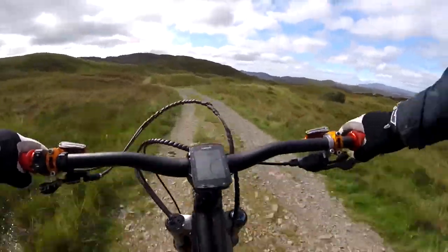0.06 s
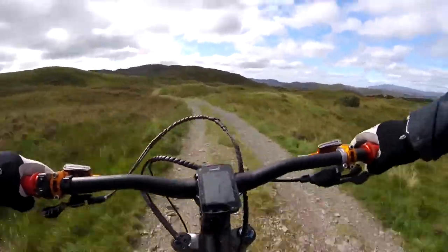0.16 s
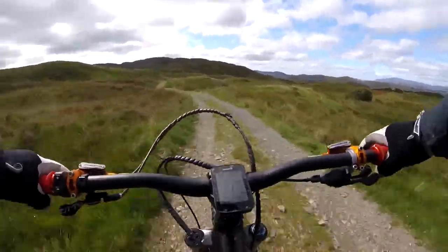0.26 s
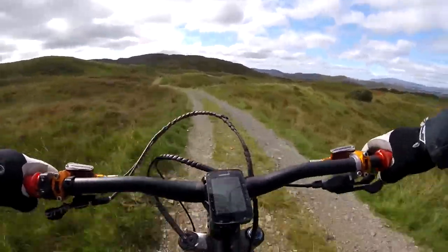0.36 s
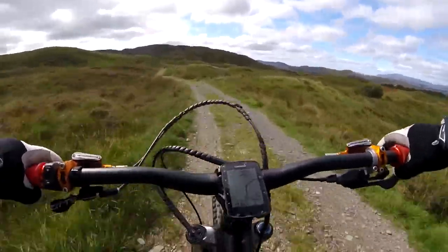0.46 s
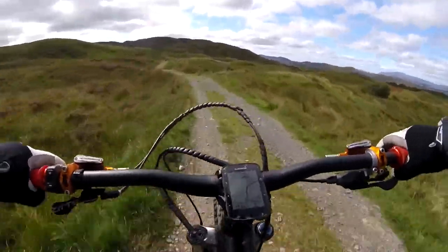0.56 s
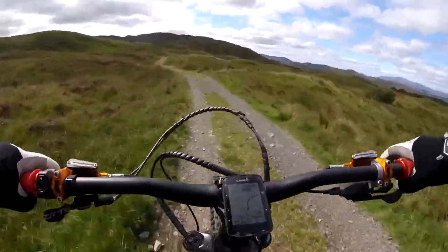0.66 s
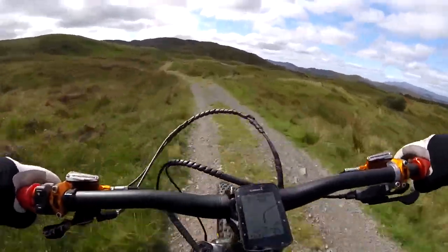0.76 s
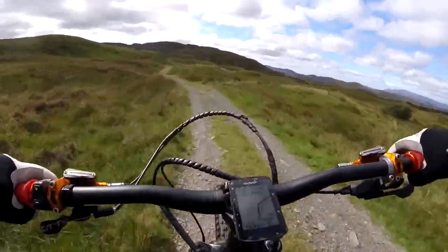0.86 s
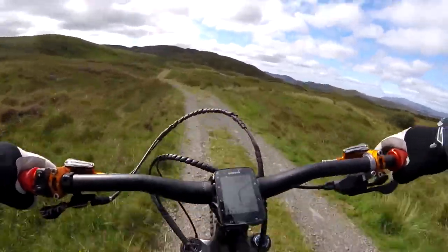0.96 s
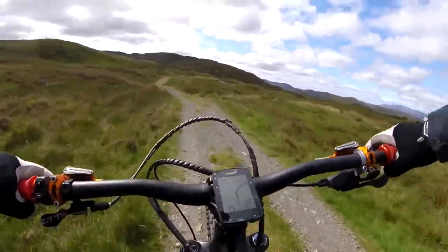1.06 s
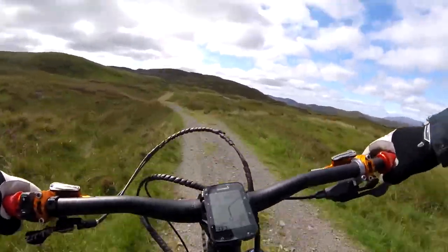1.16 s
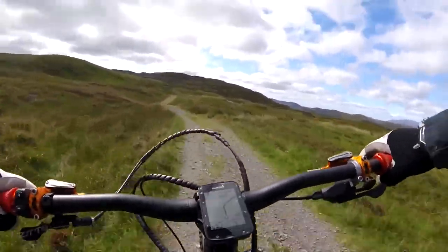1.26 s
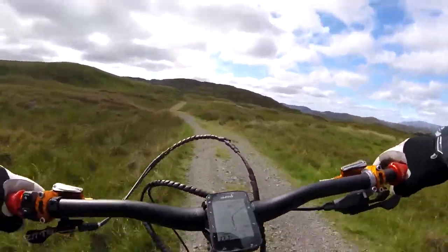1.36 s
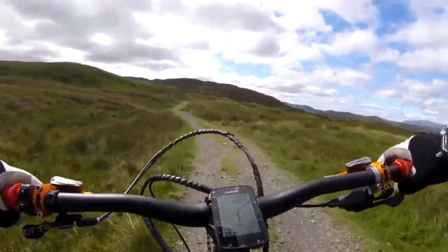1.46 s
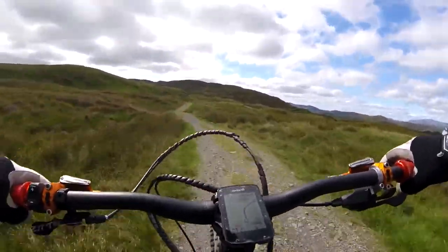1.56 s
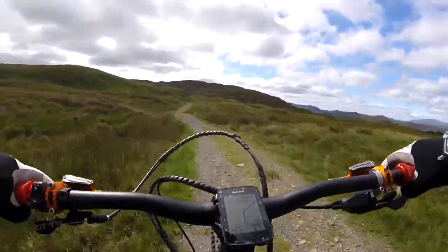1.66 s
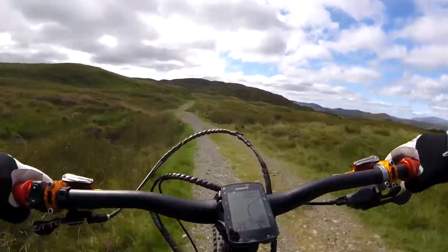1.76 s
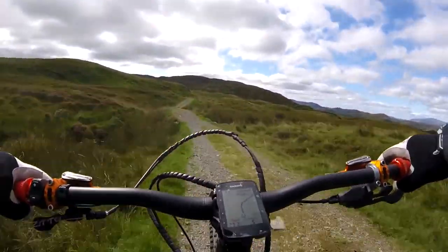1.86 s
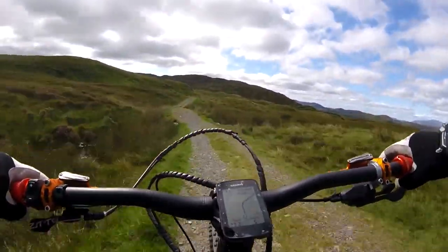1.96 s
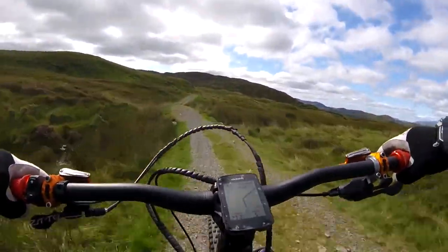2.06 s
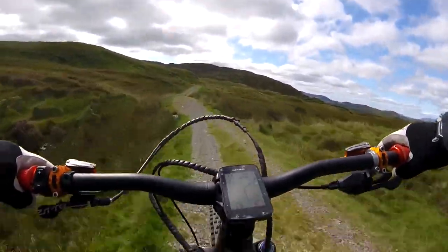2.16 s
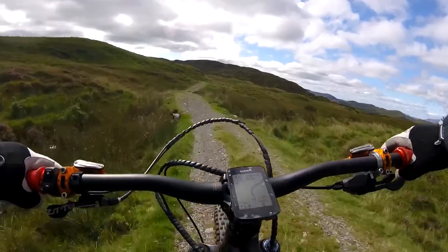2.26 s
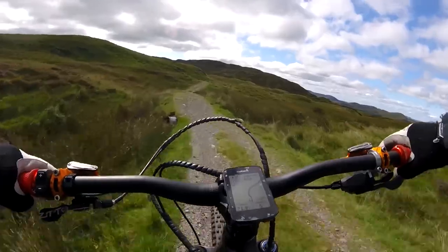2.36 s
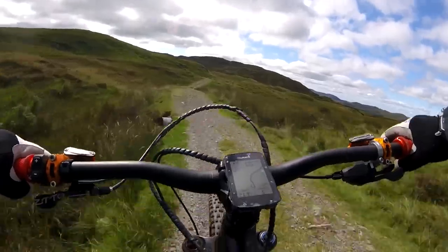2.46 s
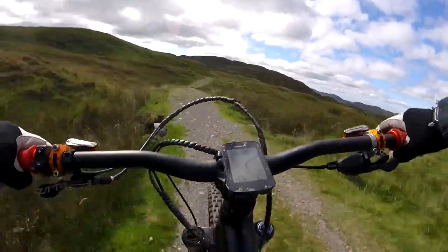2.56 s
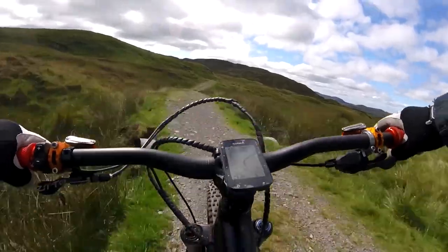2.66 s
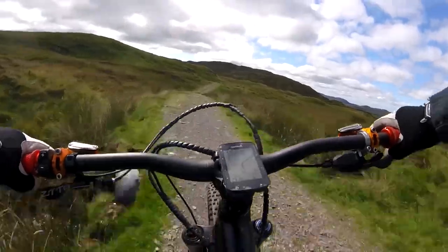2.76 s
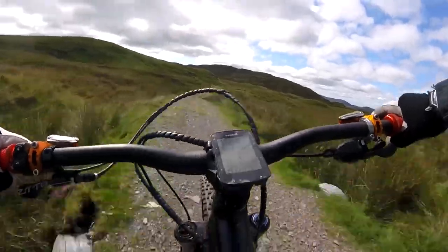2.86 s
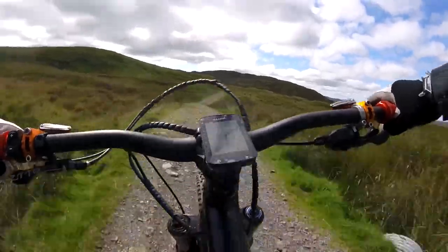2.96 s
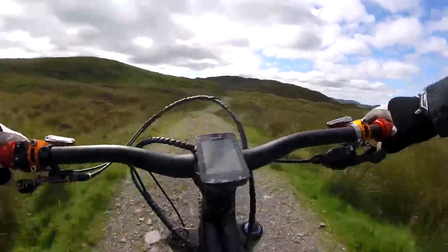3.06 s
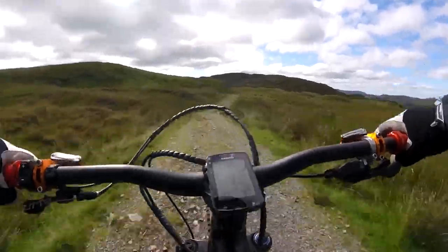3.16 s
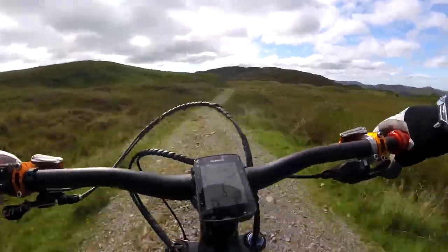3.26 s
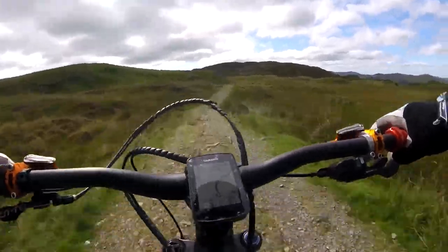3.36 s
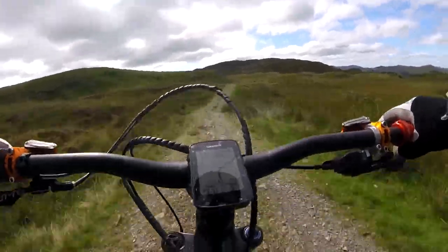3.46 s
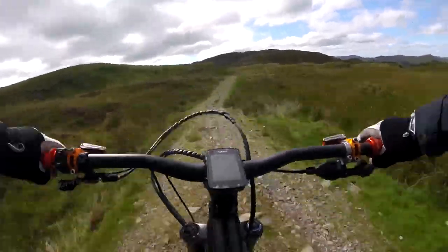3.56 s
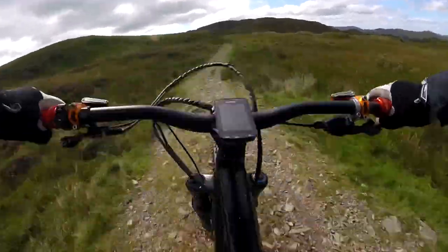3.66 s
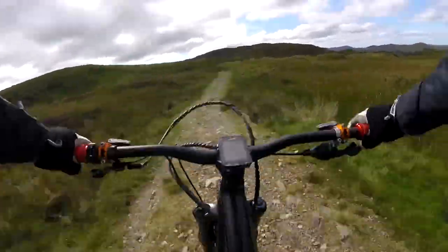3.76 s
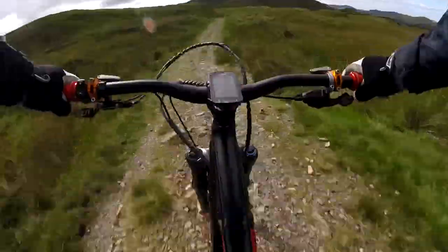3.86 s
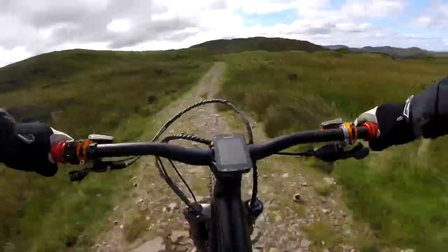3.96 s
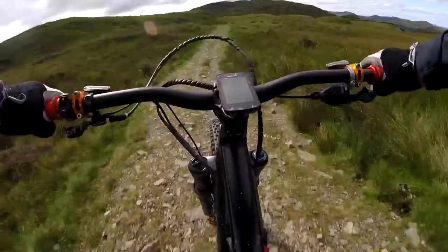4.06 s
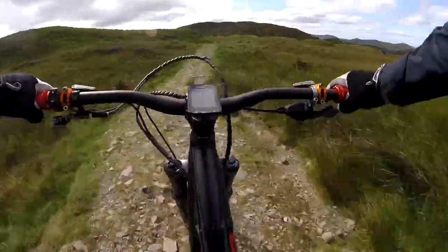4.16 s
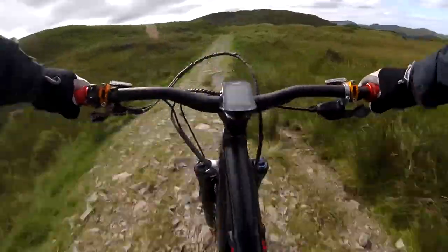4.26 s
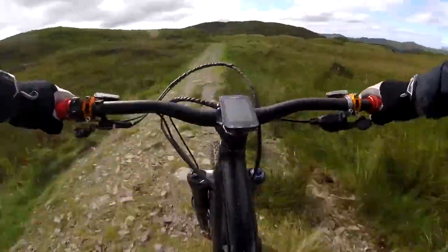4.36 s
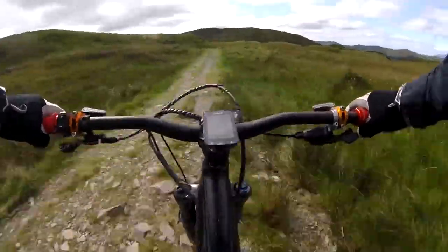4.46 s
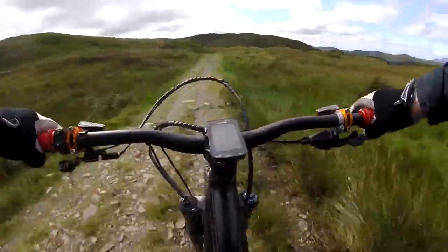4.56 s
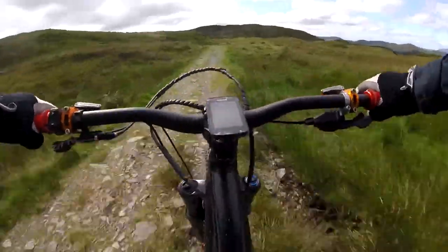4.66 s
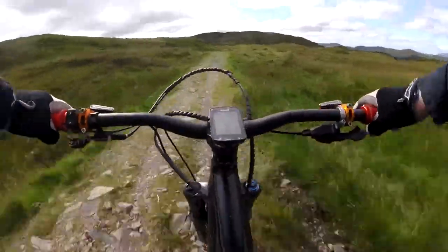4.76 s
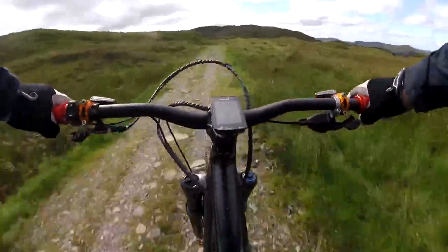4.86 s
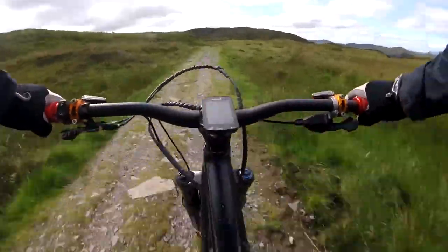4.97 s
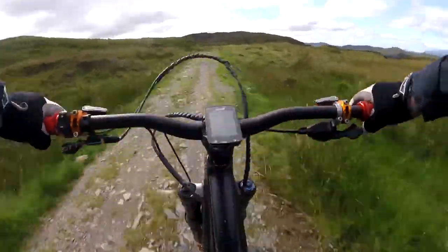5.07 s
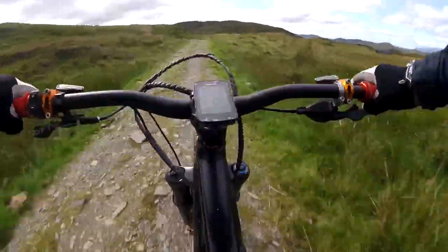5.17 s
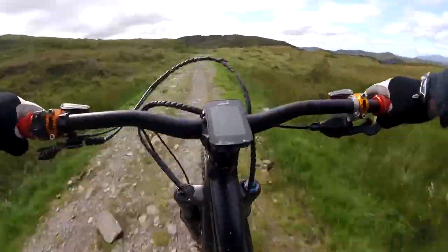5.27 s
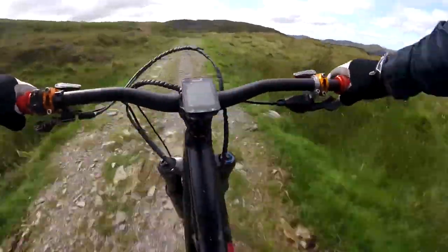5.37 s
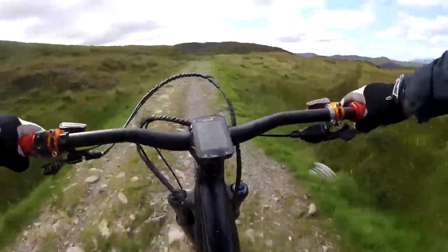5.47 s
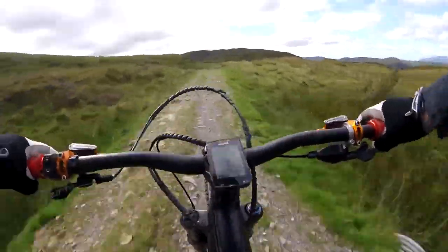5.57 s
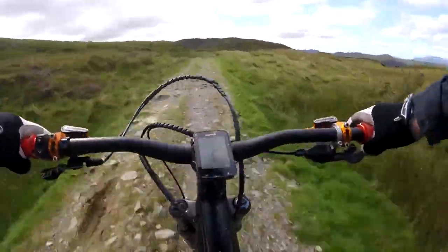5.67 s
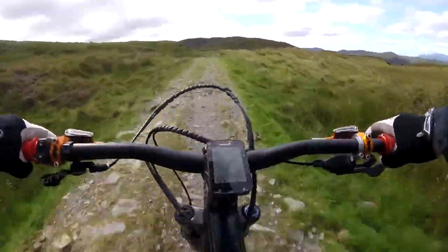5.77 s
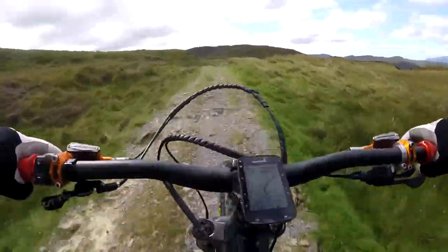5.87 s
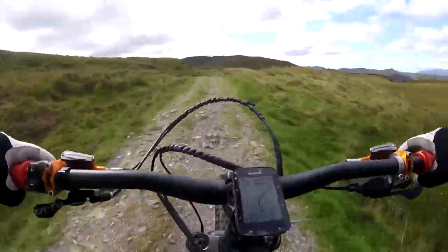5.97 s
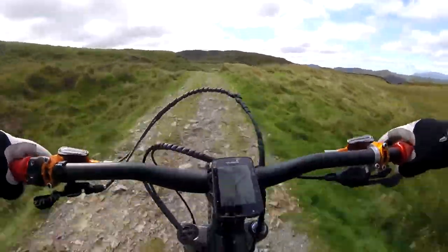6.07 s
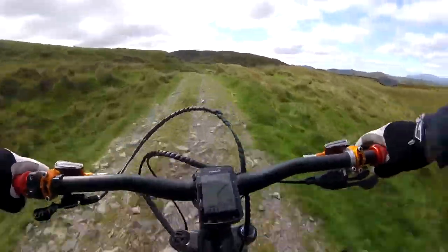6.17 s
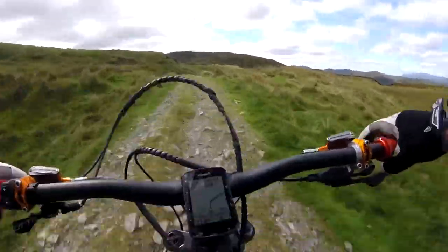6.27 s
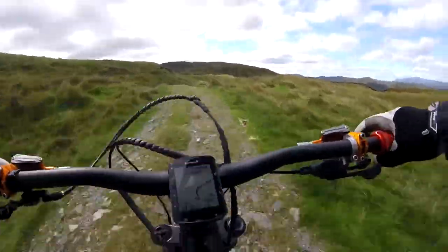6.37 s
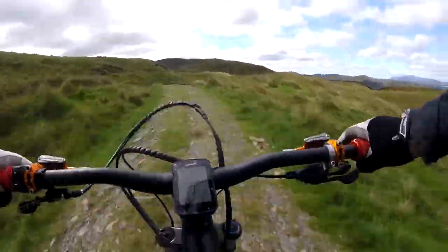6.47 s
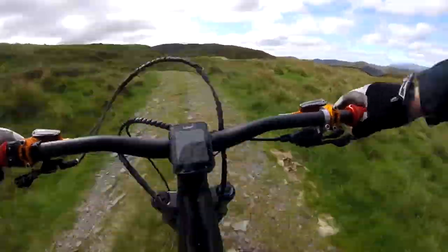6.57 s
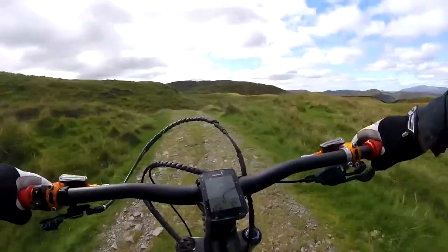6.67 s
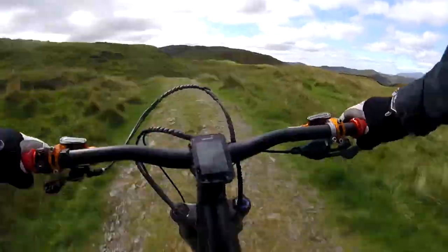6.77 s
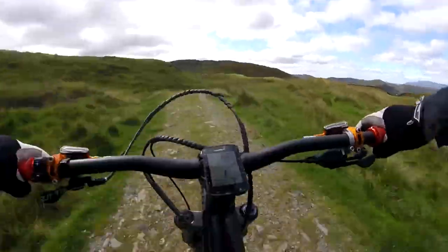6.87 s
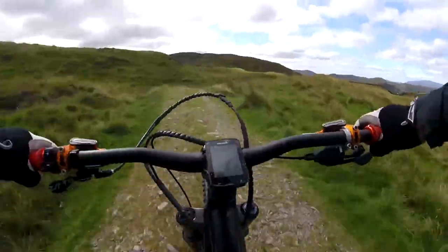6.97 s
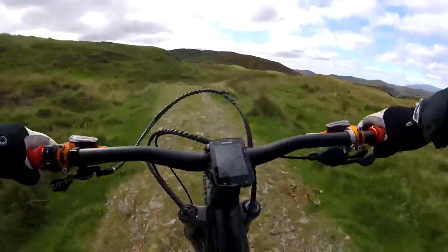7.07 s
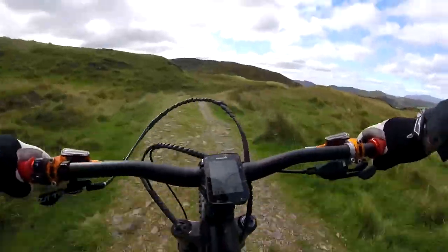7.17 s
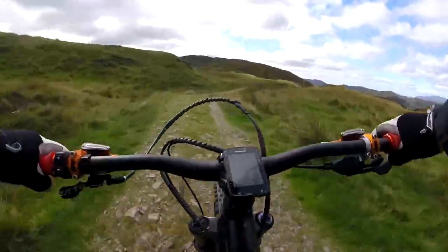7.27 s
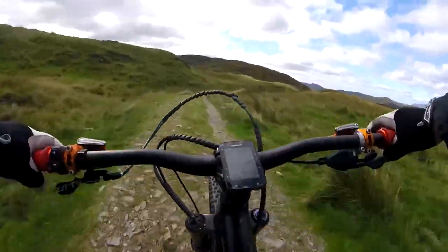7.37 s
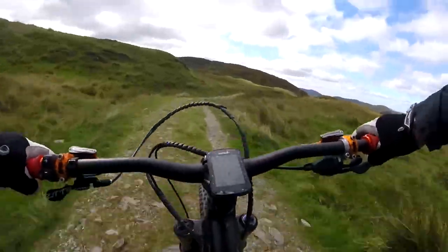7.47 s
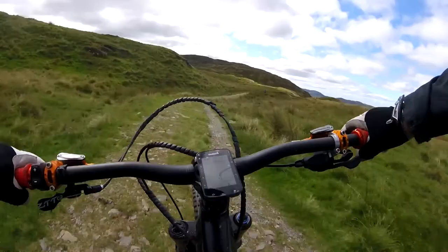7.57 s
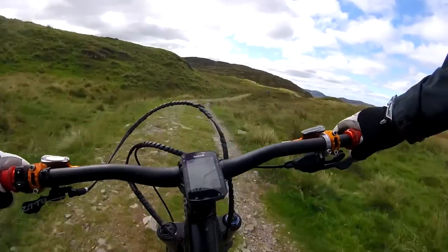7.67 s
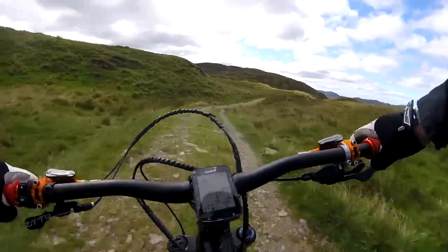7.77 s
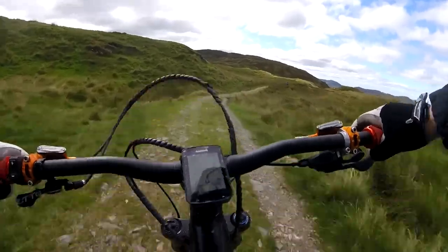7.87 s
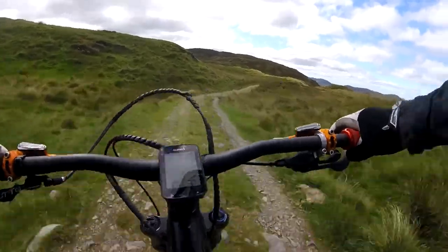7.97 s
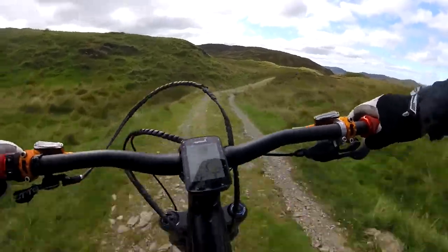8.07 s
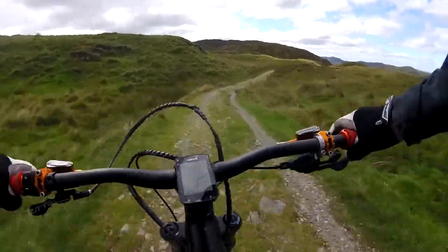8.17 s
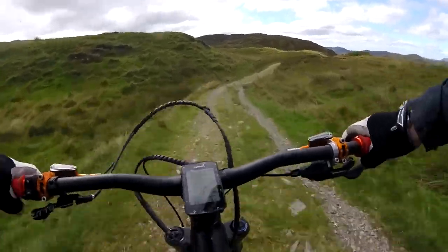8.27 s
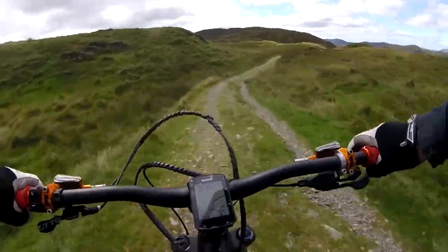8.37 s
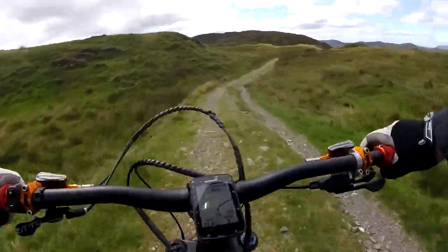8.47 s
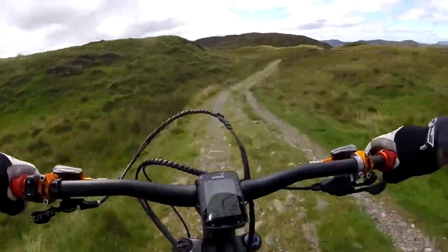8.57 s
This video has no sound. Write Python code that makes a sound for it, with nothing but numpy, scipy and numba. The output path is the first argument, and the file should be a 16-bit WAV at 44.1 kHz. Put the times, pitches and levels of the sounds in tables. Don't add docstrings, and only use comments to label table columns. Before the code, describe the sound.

Close on a rider's chest outdoors, bike tyres grind steadily over gravel with gritty hiss, ticks and dull woody stone knocks. Light wind rumble at first, then violent buffeting and slapping bursts around two and a half seconds and again from four to five and a half, with the hardest thuds. Afterwards the wind drops and quieter crunching, rattles and small pings continue to the end.

```python
import sys
import numpy as np
from scipy import signal
from scipy.fft import rfft, irfft
from scipy.io import wavfile
from scipy.ndimage import uniform_filter1d
from numba import njit

SR = 44100
rng = np.random.default_rng(int(sys.argv[2]) if len(sys.argv) > 2 else 0)


def level_to_linear(level):
    exponent = np.asarray(level, float) / 20
    return 10 ** exponent


def bounce(signal):
    frames = np.transpose(np.atleast_2d(signal))
    limited = np.clip(frames, -1, 1)
    pcm = np.round(limited * 32767).astype(np.int16)
    wavfile.write(sys.argv[1], SR, pcm)


N = 380136


def level(x):
    return x / np.sqrt(np.mean(x ** 2))


def curves(table):
    s, *columns = np.transpose(table)
    return [np.interp(np.arange(N) / SR, s, c) for c in columns]


def colour(x, points, size=8192):
    hz, db = np.transpose(points)
    log_hz = np.log(np.arange(size // 2 + 1) * SR / size + 1)
    log_gain = np.interp(log_hz, np.log(hz), db) * np.log(10) / 20
    cepstrum = irfft(log_gain)
    cepstrum[1:size // 2] *= 2
    cepstrum[size // 2 + 1:] = 0
    return signal.fftconvolve(x, irfft(np.exp(rfft(cepstrum))))[:N]


def bursts(per_s, spread_db, tail_s):
    sizes = level_to_linear(2 * spread_db * rng.exponential(size=N).clip(0, 5))
    starts = (rng.random(N) < per_s / SR) * sizes
    decay = np.exp(-1 / (tail_s * SR))
    power = signal.lfilter([1], [1, -decay], uniform_filter1d(starts, size=100))
    return level(np.sqrt(power + 1e-9))


def swells(start, length, db, edge_s):
    t = np.arange(N) / SR
    power = 0
    for s, held, d in zip(start, length, db):
        inside = np.minimum(t - s, s + held - t) / edge_s + .5
        power = power + level_to_linear(2 * d) * np.clip(inside, 0, 1) ** 2
    return power


@njit
def ring(start, hz, t60, rise, size):
    out = np.zeros(N)
    for k in range(len(start)):
        p = np.exp(2j * np.pi * hz[k] / SR - np.log(1000) / (t60[k] * SR))
        z = size[k] + 0j
        first = int(start[k] * SR)
        for i in range(min(int(t60[k] * SR), N - first)):
            out[first + i] += z.imag * min(1., i / (rise * SR))
            z *= p
    return out


def strike(s, hz, t60, db, rise, scatter, count):
    chance = rng.standard_normal((len(s), 3 * count)).reshape(len(s), 3, count)
    fan = np.linspace(-1, 1.2, count)
    when = s[:, None] + .5 * rise * np.abs(chance[:, 0])
    pitch = hz[:, None] * np.exp(scatter * (fan + 0.17 * chance[:, 1]))
    size = level_to_linear(db[:, None] - 8 * np.abs(fan) + 1.5 * chance[:, 2])
    return ring(when.ravel(), pitch.ravel().clip(30, 11000), np.full(when.size, t60), rise, size.ravel())


def snaps(s, db, t60, points):
    push = np.zeros(N)
    for when, size, life in zip(s, level_to_linear(db), np.clip(t60, .003, .06)):
        t = np.arange(int(life * SR)) / SR
        first = int(when * SR)
        click = size * np.minimum(1, t / 0.001) * 1000. ** (-t / life)
        push[first:first + len(t)] += click[:N - first]
    noise = rng.standard_normal(N)
    return colour(push * noise, points) / np.std(colour(noise, points))


def pebbles(per_s, low_hz, octaves, spread_db):
    chance = rng.random((int(per_s * N / SR), 4)).T
    hz = low_hz * 2 ** (octaves * chance[1])
    size = level_to_linear(-spread_db * np.log(chance[2] + 0.11)) * low_hz / hz
    t60 = (6 + 14 * chance[3]) / hz
    return level(ring(chance[0] * (N - 1) / SR, hz, t60, 0.0019, size))


def wind():
    # start_s, strength_db, bite_db (buffet over rumble)
    breeze = [(0, -30.5, -0.5), (0.6, -32, -3.5), (1.2, -33, -3.5), (2.0, -31.5, -1), (2.6, -27, -6),
              (3.2, -34, -4), (3.8, -33.5, -0.5), (4.6, -26.5, -3.5), (5.5, -27.5, -10.5), (6.0, -30, -6),
              (6.7, -33, -3), (7.1, -32.5, -6.5), (7.7, -31.5, -8), (8.62, -32, -8)]
    # start_s, length_s, strength_db, bite_db
    gusts = [(2.178, 0.063, -22, -5.5), (2.254, 0.057, -16, -16), (2.336, 0.095, -13, -14),
             (2.426, 0.12, -29, -14), (2.537, 0.067, -9, -10), (2.604, 0.11, -14.5, -4.5),
             (2.67, 0.077, -9.5, -7), (2.765, 0.082, -10.5, -21), (2.848, 0.11, -20, -13.5),
             (2.987, 0.023, -8, -20), (3.906, 0.058, -14, -13.5), (3.964, 0.083, -23, -6.5),
             (4.057, 0.22, -10.5, -9.5), (4.122, 0.12, -14.5, -11.5), (4.35, 0.1, -13, -10),
             (4.441, 0.077, -2.5, -15), (4.546, 0.067, -6, -17), (4.628, 0.164, -16.5, -9),
             (4.81, 0.052, -29, -6), (4.907, 0.14, -17, -8.5), (5.053, 0.091, -7.5, -12),
             (5.148, 0.078, -8, -8), (5.227, 0.21, -24.5, -5.5), (5.312, 0.085, -13, -10.5),
             (5.396, 0.042, -22, -2), (5.44, 0.071, -11, -8), (6.602, 0.092, -22.5, -8),
             (6.754, 0.09, -28.5, -3), (7.973, 0.1, -22.5, -17), (8.364, 0.089, -24.5, -10.5)]
    # start_s, strength_db
    short_puffs = [(0.0, -18), (0.26, -33), (0.475, -21), (0.84, -22.5), (1.636, -19), (1.949, -34),
                   (2.025, -41), (3.1, -25), (3.59, -35), (3.69, -24.5), (4.28, -28), (5.93, -23),
                   (6.11, -22), (6.18, -27), (6.367, -26.5), (6.67, -30), (6.779, -23), (7.385, -31),
                   (7.455, -33.5), (8.179, -28), (8.529, -26), (8.59, -27)]
    # pitch_hz, level_db (per Hz)
    rumble_shape = [(12, -27), (20, 0), (53, 2), (123, -4.5), (168, -11), (220, -10), (290, -49),
                    (480, -120)]
    buffet_shape = [(90, -24), (170, -5), (220, 1), (370, -5), (520, -15), (750, -16.5), (1400, -36),
                    (2500, -85)]
    # pitch_hz, gain_db
    gust_tilt = [(45, -1), (150, 3)]
    puff_s, puff_bite_db, edge_s = 0.034, -21, 0.011

    breeze_db, bite_db = curves(breeze)
    events = gusts + [(s, puff_s, db, puff_bite_db) for s, db in short_puffs]
    s, length, db, bite = np.transpose(events)
    heave = np.sqrt(swells(s, length, db, edge_s))
    flap = np.sqrt(level_to_linear(2 * (breeze_db + bite_db)) + swells(s, length, db + bite - 3.0, edge_s))

    eddies = bursts(60, spread_db=2.0, tail_s=0.0093)
    puffs = bursts(150, spread_db=2.5, tail_s=0.0013)
    pats = level((rng.random(N) < 70 / SR) * rng.laplace(size=N))
    rumble = (.5 + eddies) * rng.standard_normal(N) + 0.44 * pats
    rumble = level(colour(rumble, rumble_shape))
    buffet = (1.97 + eddies) * (1.0 + puffs) * rng.standard_normal(N) + 0.93 * pats
    buffet = level(colour(buffet, buffet_shape))
    gust_rumble = level(colour(rumble, gust_tilt))
    deep = level_to_linear(breeze_db) * rumble + level_to_linear(-4) * heave * gust_rumble
    return level_to_linear(1.86) * deep + level_to_linear(1.5) * flap * buffet


def slaps(air):
    # start_s, peak_db,
    # width_ms
    slap_events = [(1.6702, -16.0, 1.4), (1.8078, -11.0, 0.6), (2.3492, -11.0, 1.2), (2.3765, -11.0, 1.8),
                   (2.4028, -10.5, 1.8), (2.5492, -10.0, 0.6), (2.5687, -7.5, 0.8), (2.5845, -9.5, 1.0),
                   (2.6498, -8.0, 1.8), (2.6666, -8.0, 0.6), (2.703, -3.0, 0.8), (2.7764, -11.5, 1.4),
                   (2.8304, -10.5, 1.0), (2.9907, -3.0, 0.8), (3.9436, -8.0, 0.6), (4.0911, -6.0, 0.6),
                   (4.1184, -9.0, 0.6), (4.1315, -6.0, 0.6), (4.1404, -5.5, 0.8), (4.1486, -4.5, 0.6),
                   (4.1636, -6.5, 1.0), (4.1882, -3.5, 4.0), (4.2358, -10.5, 0.8), (4.3498, -6.5, 0.8),
                   (4.4413, -9.5, 0.6), (4.459, -10.5, 2.2), (4.4671, -6.0, 1.0), (4.4759, -5.5, 1.0),
                   (4.4869, -11.0, 1.2), (4.4968, -7.5, 1.0), (4.5529, -2.0, 0.8), (4.5615, -9.5, 1.0),
                   (4.5707, -1.0, 2.4), (4.593, -9.5, 0.6), (4.6325, -9.0, 1.4), (4.6909, -6.0, 0.8),
                   (4.769, -11.0, 1.2), (4.9221, -8.5, 0.6), (5.0179, -7.5, 0.6), (5.0642, -6.5, 2.0),
                   (5.1234, -8.0, 0.6), (5.1444, -8.5, 0.6), (5.1503, -4.5, 0.6), (5.1663, -8.0, 2.6),
                   (5.1934, -8.0, 0.6), (5.3385, -6.0, 1.0), (5.3468, -2.0, 0.8), (5.359, -8.5, 0.8),
                   (5.4093, -4.0, 0.6), (5.4574, -10.5, 0.8), (5.4777, -8.0, 0.6), (5.4932, -8.5, 0.8),
                   (5.502, -11.5, 1.6), (6.5725, -15.0, 2.6), (8.0006, -11.5, 1.2),
                   (0.2693, -25, 1.4),
        (0.661, -26, 2.2),
        (1.4254, -21, 0.65),
        (6.355, -16, 0.91),
        (6.6085, -15, 1.1),
        (6.775, -15.5, 1.3),
        (8.027, -12.5, 1.3),
    ]
    # start_s, peak_db, width_ms
    tug_events = [
        (2.678, -4.5, 2.4),
        (2.7165, -6.0, 0.6),
        (2.7884, -6.0, 1.2),
        (3.3128, -15.5, 0.6),
        (4.0807, -5.0, 0.6),
        (4.0971, -5.0, 0.8),
        (4.405, -7.0, 0.6),
        (5.0881, -4.0, 1.2),
        (5.3531, -3.0, 1.0),
    ]
    recoil_hz, soft_hz, hush_s, hush_depth = 85, 680, .008, .82

    push, hush = np.zeros(N), np.ones(N)
    t = np.arange(-800, 800) / SR
    events = [(1, *row) for row in slap_events] + [(-1, *row) for row in tug_events]
    for sign, s, db, ms in events:
        near = slice(int(s * SR) - 800, int(s * SR) + 800)
        push[near] += sign * level_to_linear(db + 6) / (1 + (t / (0.00058 * ms)) ** 2)
        hush[near] *= 1 - hush_depth * np.exp(-(t / hush_s - .4) ** 2)
    push = signal.filtfilt(*signal.butter(2, soft_hz, fs=SR), push)
    recoil = signal.lfilter(*signal.cheby1(2, 3, recoil_hz, "high", fs=SR), push)
    return hush * air + recoil


def tyres():
    # start_s, load_db, fine_db (share of fine grit)
    roll = [(0.0, -36, -3), (0.29, -40.5, -3.5), (0.6, -40, -3.5), (1.22, -37.5, -6), (1.6, -38.5, -6),
            (2.5, -35, -6), (2.75, -36.5, -8), (3.1, -40, -6), (3.62, -41.5, -4.5), (4.1, -36.5, -3.5),
            (4.55, -37, -5.5), (5.2, -36, -5.5), (5.33, -40.5, -6), (5.69, -42, -5), (6.39, -38, -5),
            (7.01, -43, -3), (8.2, -45.5, 1), (8.62, -41, -3)]
    # middle_s, extra_db
    patches = [(0.32, 4), (2.57, 4), (3.31, 1.5), (3.45, 2.5), (3.94, 4.5), (4.1, 3), (5.233, 3.5),
               (6.6, 2.5), (7.75, 6), (8.311, 2), (8.48, 0.5)]
    # pitch_hz, level_db (per Hz)
    crunch_shape = [(250, -29.5), (520, 1), (660, -10), (900, -2), (1250, -5.5), (1500, -3), (1900, -9.5),
                    (2200, -9.5), (3200, -16.5), (4100, -22.5), (5000, -79)]
    grit_shape = [(3200, -33), (4400, -21), (5100, -12), (5700, -9.5), (6000, -10), (6550, 0.5),
                  (7100, -9.5), (8700, -17), (10800, -30.5), (11600, -40.5), (14000, -48.5)]
    patch_s = 0.048

    load_db, fine_db = curves(roll)
    t = np.arange(N) / SR
    crunch_db = load_db + sum(db * np.exp(-((t - s) / patch_s) ** 2) for s, db in patches)
    grit_db = crunch_db + fine_db
    shifts = bursts(70, spread_db=2.5, tail_s=0.012)
    cracks = bursts(200, spread_db=2.0, tail_s=0.0022)
    chips = bursts(170, spread_db=5.5, tail_s=0.0045)
    crunch = colour((.3 + .55 * shifts + .6 * cracks) * rng.standard_normal(N), crunch_shape)
    grit_motion = 1.54 + 0.21 * shifts + 0.75 * chips + 0.053 * cracks
    grit = colour(grit_motion * rng.standard_normal(N), grit_shape)
    coarse = level(crunch) + 0.41 * pebbles(130, low_hz=752, octaves=2.01, spread_db=2.0)
    fine = level(grit) + 0.26 * pebbles(90, low_hz=5790, octaves=0.91, spread_db=6.0)
    return level_to_linear(crunch_db) * coarse + level_to_linear(grit_db + 0.5) * fine


def pings():
    # start_s, peak_db, pitch_hz
    tube_pings = [(.1825, -31.5, 2100), (.656, -32, 2110), (.908, -29, 1110), (1.116, -33.5, 2140),
                  (1.465, -27, 1000), (1.53, -27.5, 1190), (1.588, -24.5, 557), (1.915, -28, 1190),
                  (2.1274, -27.5, 1120), (2.28, -25, 1140), (2.405, -26, 1160), (2.83, -30.5, 1650),
                  (3.015, -27, 877), (3.684, -25, 1610), (3.706, -33, 1120), (3.769, -42, 1480),
                  (3.805, -34, 2310), (4.0946, -28, 2160), (4.238, -26, 1110), (4.351, -21.5, 1534),
                  (4.4004, -29.5, 2100), (4.416, -36, 2130), (4.568, -29, 2170), (4.851, -25.5, 1040),
                  (4.881, -28.5, 1410), (5.2345, -24, 1514), (5.2285, -35, 2140), (5.305, -36, 1500),
                  (5.442, -36, 2100), (5.8733, -31.5, 1415), (6.226, -29.5, 1440), (6.449, -32, 2210),
                  (6.621, -30, 2120), (6.797, -29, 870), (6.815, -32, 1250), (6.862, -38, 1670),
                  (7.055, -33.5, 2160), (7.0885, -34, 1590), (7.13, -32.5, 1500), (7.3228, -32, 2200),
                  (7.408, -35, 1170), (7.5607, -35.5, 2210), (7.589, -34, 2190), (7.586, -30, 1520),
                  (7.728, -37, 2130), (7.736, -26.5, 1125), (7.777, -30, 1060), (7.92, -30, 1120),
                  (8.1115, -36.5, 2240), (8.308, -34, 2150), (8.31, -30, 1150), (8.4966, -31, 2050),
                  (8.497, -32, 1140)]
    # start_s, peak_db, pitch_hz
    knock_thuds = [(.315, -12.5, 339), (0.44, -12.5, 238), (0.657, -14, 308), (2.196, -15, 250),
                   (2.989, -25, 466), (2.998, -16, 410), (3.544, -16.5, 234), (3.703, -22, 225),
                   (4.091, -3.5, 227), (4.3503, -8.5, 477), (4.403, -18, 242), (5.184, -16, 470),
                   (6.605, -14, 328), (6.751, -14, 231), (6.764, -22, 260), (7.721, -18, 222),
                   (7.881, -17, 303), (8.302, -22, 238), (8.398, -27, 219)]
    s, db, hz = np.transpose(tube_pings)
    when, thud_db, thud_hz = np.transpose(knock_thuds)
    tube = ring(s, hz, 0.032 + 0 * s, 0.0011, level_to_linear(db + 3.0))
    thuds = ring(when, thud_hz, 0.033 + 0 * when, 0.0012, level_to_linear(thud_db))
    return tube - thuds


def ticks():
    # start_s, peak_db
    rim_ticks = [(0.012, -20), (0.077, -30), (0.476, -16.5), (0.539, -22), (0.914, -27), (0.9667, -26),
                 (1.757, -21.5), (1.837, -23.5), (2.0961, -27.5), (2.331, -33), (2.4378, -16.5),
                 (2.4592, -27), (2.6633, -27.5), (3.549, -34), (3.596, -31.5), (3.668, -29), (3.684, -21.5),
                 (3.8094, -23), (3.911, -24.5), (4.314, -23.5), (4.35, -23), (4.824, -24), (4.8804, -26.5),
                 (5.981, -23), (6.0632, -24), (6.286, -24), (6.646, -24.5), (6.7005, -27.5), (7.323, -30),
                 (7.413, -26), (8.4976, -37)]
    # start_s, peak_db, edge_db
    sharp_chips = [(0.108, -26, -40), (0.156, -23.5, -33.5), (0.4396, -10.5, -27.5), (0.5253, -27, -35),
                   (1.0253, -23, -46), (1.271, -19, -37.5), (1.9555, -13, -35), (2.376, -28, -43),
                   (2.4002, -36, -38.5), (2.495, -23, -37.5), (3.432, -26.5, -42), (3.784, -27, -35),
                   (3.95, -20.5, -35.5), (4.1375, -23, -32.5), (4.2013, -22, -34), (6.62, -23, -46),
                   (6.788, -28, -33.5), (7.0227, -28, -35.5), (7.756, -30, -35.5), (7.817, -33, -34),
                   (7.932, -34.5, -33.5), ]
    # start_s, peak_db
    spoke_hits = [
        (0.44, -6),
        (0.443, -8),
        (1.9576, -20),
        (5.9803, -21),
    ]
    # pitch_hz, level_db, ring_s
    spoke_modes = [
        (5650, 0.5, 0.011),
        (5500, 2.9, 0.0049),
    ]
    # pitch_hz, level_db (per Hz)
    cavity_shape = [(3500, -58), (5000, -31.5), (5700, -2.5), (6100, -9), (6550, 2), (7200, -10),
                    (9000, -18), (11500, -58)]
    edge_shape = [(2000, -17.5), (3200, -5.5), (4300, -11), (5200, -7.5), (7500, -19), (9000, -6),
                  (10800, -14), (11600, -31.5), (14000, -46)]

    s, peak_db, edge_db = np.transpose(sharp_chips + [(s, db, db - 23.5) for s, db in rim_ticks])
    t60 = 0.022 + 0.0001 * (peak_db + 23.5)
    cavity = snaps(s, peak_db - 1.0, t60, cavity_shape)
    edge = snaps(s, edge_db + 9.0, 0.43 * t60, edge_shape)
    when, blow_db = np.transpose(spoke_hits)
    spoke = sum(ring(when, hz + 0 * when, life + 0 * when, 0.0004, level_to_linear(blow_db + db))
                for hz, db, life in spoke_modes)
    return signal.lfilter(*signal.butter(4, 12000, fs=SR), cavity + edge + spoke)


def knocks():
    # start_s, peak_db, pitch_hz, thump_db
    blows = [(1.808, -6, 876, -3), (2.5649, -5.5, 1060, -4), (2.594, -2, 624, -16), (2.987, -4, 890, -16),
             (2.996, -9, 640, -19), (3.3113, -5, 950, -7), (3.547, -14, 630, -22), (4.13, -11, 1130, -32),
             (4.689, -18, 3220, -10), (5.158, -14, 1880, -32), (7.625, -19, 1000, -19),
             (3.941, -2.5, 1000, -8), (4.0646, -5, 786, -10), (4.092, -10, 1380, -26),
             (4.159, -7.5, 720, -22), (4.3503, -1, 800, 0), (4.472, -5, 640, -25), (4.551, -11, 890, -19),
             (4.726, -19, 830, -28), (5.125, -7, 760, -19), (5.185, -6, 710, -20), (5.407, -12.5, 594, -26),
             (0.316, -6.5, 1225, -16), (0.4392, -15.5, 950, -18.5), (0.657, -19.5, 710, -25),
             (7.883, -16, 595, -37)]
    # start_s, peak_db, pitch_hz
    taps = [(0.011, -10.5, 2460), (0.574, -20, 705), (0.754, -12, 1270), (1.796, -13.5, 795),
            (2.103, -13, 880), (2.196, -14.5, 820), (2.231, -11, 1090), (2.395, -7, 870), (2.438, -11, 910),
            (2.716, -15, 740), (2.971, -12.5, 840), (3.287, -18, 805), (3.429, -16, 1020),
            (3.67, -15.5, 1670), (5.202, -18, 855), (5.777, -15.5, 905), (6.0, -15.5, 806),
            (6.059, -17, 805), (6.367, -11, 1130), (6.556, -23, 1520), (6.621, -11, 1480),
            (7.089, -13, 875), (7.745, -15, 1080), (8.462, -18.5, 1104)]
    # start_s, peak_db
    crack_events = [(0.23, -24), (0.439, -24), (2.658, -26.5), (2.986, -34), (3.941, -23.5), (4.352, -27),
                    (4.396, -39), (4.552, -30), (4.689, -19), (5.234, -26), (5.273, -29.5), (5.777, -31.5),
                    (6.0, -27.5), (6.06, -27.5), (6.294, -27), (6.369, -25), (6.454, -23.5), (6.555, -28),
                    (6.604, -25.5), (6.622, -28), (6.787, -28.5), (6.814, -29.5), (6.925, -23),
                    (6.996, -34), (7.437, -27.5), (7.739, -28), (8.302, -35)]
    # pitch_hz, level_db (per Hz)
    crack_shape = [(500, 0.5), (1200, 12), (1600, 13), (2200, 5.5), (3300, 0.5), (4300, -9.5),
                   (6000, -56.5)]

    s, peak_db, hz, thump_db = np.transpose(blows + [(s, db, hz, db - 12) for s, db, hz in taps])
    note = strike(s, hz, 0.011, peak_db - 6, rise=.0007, scatter=0.43, count=5)
    thump = strike(s, 190 + 0 * s, 0.02, thump_db - 2, rise=0.0011, scatter=0.51, count=2)
    when, crack_db = np.transpose(crack_events)
    return snaps(when, crack_db, 0.03 + 0 * when, crack_shape) - note - thump


def scene():
    return (slaps(wind()) + tyres() + knocks() + pings() + ticks())[None]


def band_limit(x):
    return signal.sosfilt(signal.butter(12, 14100, fs=SR, output="sos"), x)


def record(dry):
    heave = signal.filtfilt(*signal.butter(2, 3000, fs=SR), dry)
    mix = (np.tanh(1.048 * heave) + dry - heave) / 1.221
    return band_limit(mix)


dry = scene()
out = record(dry)
bounce(out)
```